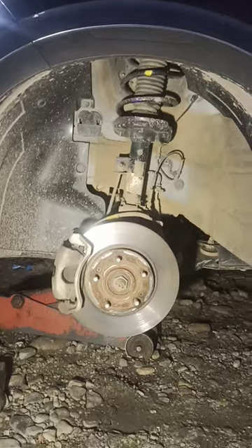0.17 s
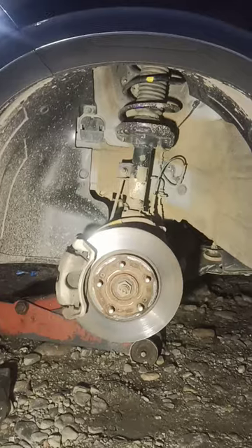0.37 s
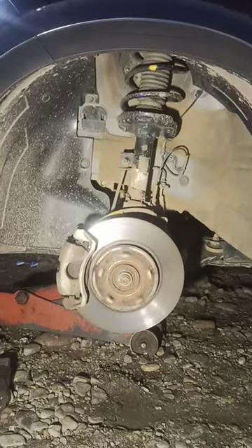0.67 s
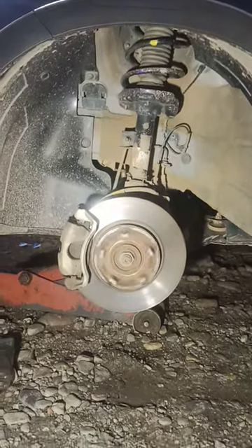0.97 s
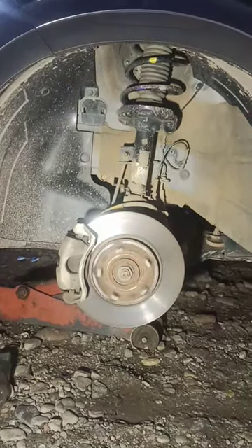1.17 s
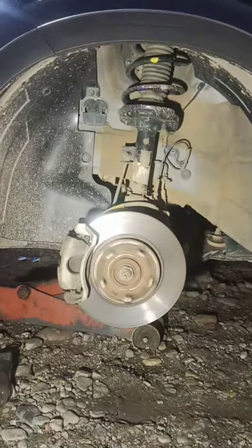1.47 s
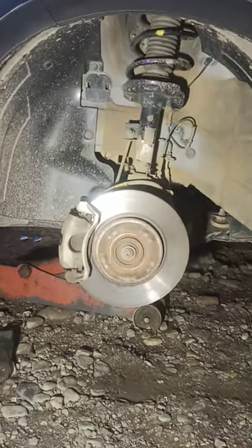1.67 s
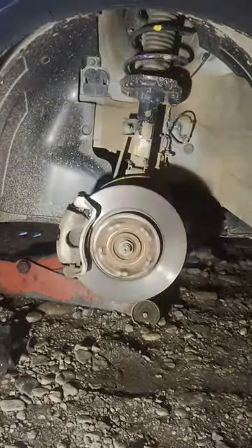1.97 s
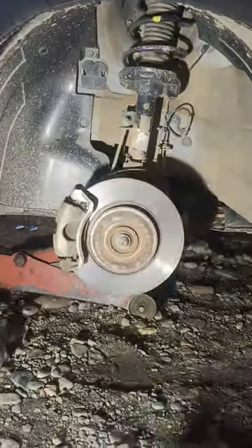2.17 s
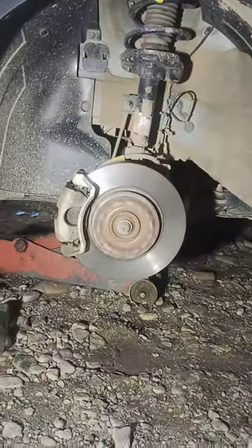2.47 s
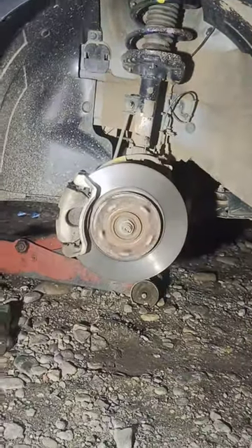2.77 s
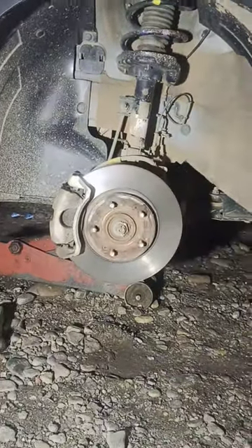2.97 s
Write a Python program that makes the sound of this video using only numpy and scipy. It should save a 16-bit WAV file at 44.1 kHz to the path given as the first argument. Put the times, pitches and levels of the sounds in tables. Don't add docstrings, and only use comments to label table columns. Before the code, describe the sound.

A jacked-up car idles in gear, its bare hub turning: fluttering low rumble and gear roar, faint brake hiss, scuffs and thumps, disc ringing midway, a bright clink later; outdoors, close phone microphone.

```python
import sys
import numpy as np
from scipy import signal
from scipy.io import wavfile
from scipy.ndimage import uniform_filter1d

SR = 44100
rng = np.random.default_rng(int(sys.argv[2]) if len(sys.argv) > 2 else 0)


def ratio(d):
    e = np.asarray(d, float) / 20
    return 10 ** e


def to_wav(s):
    ch = np.atleast_2d(s).T
    pcm = np.round(np.clip(ch, -1, 1) * 32767)
    wavfile.write(sys.argv[1], SR, pcm.astype(np.int16))


N = 137151
T = np.arange(N) / SR


def evened(x):
    return x / np.sqrt(np.mean(x ** 2) + 1e-20)


def curve(times_s, values):
    return np.interp(T, times_s, values)


def kept(start_s, length_s, edge_s, release_s=None):
    rise = (T - start_s) / edge_s
    fall = (start_s + length_s - T) / (release_s or edge_s)
    return np.sin(np.pi / 2 * np.clip(np.minimum(rise, fall), 0, 1)) ** 2


def slice_steps():
    slice_s = 0.022
    steps = np.clip(rng.standard_normal(400), -2, 2)
    number = np.minimum(T / slice_s, 399).astype(int)
    return uniform_filter1d(steps[number], size=300)


def noise(points, patchy_db, slice_db, slices, size=512, wide=6, long=8):
    hop = size // 4
    point_hz, point_db = np.transpose(points)
    frames, hz = N // hop + 5, np.fft.rfftfreq(size, 1 / SR)
    real, imag, patch = rng.standard_normal((frames, len(hz), 3)).T
    patch = uniform_filter1d(patch, size=int(wide), axis=0)
    patch = evened(uniform_filter1d(patch, size=int(long), axis=1))
    colour_db = np.interp(np.log(hz + 1), np.log(point_hz + 1), point_db, left=-90, right=-90)
    spectrum = (real + 1j * imag) * ratio(colour_db[:, None] + patchy_db * np.clip(patch, -2, 2))
    sound = signal.istft(spectrum, nperseg=size, noverlap=size - hop)[1][:N]
    return evened(sound * ratio(slice_db * slices))


def slow_wander():
    wander = uniform_filter1d(rng.standard_normal(12000), size=150)
    return evened(uniform_filter1d(wander, size=150))


def held(rows, swell, waver, beat_db):
    out = np.zeros(N)
    for start_s, length_s, pitch_hz, level_db in rows:
        drift, beat = slow_wander(), slow_wander()
        first = round(start_s * SR)
        at = slice(first, first + 12000)
        phase = 2 * np.pi * np.cumsum(pitch_hz * (1 + waver * drift)) / SR
        tone = np.sin(phase) * ratio(level_db + beat_db * beat)
        gain = kept(start_s, length_s, swell * length_s)[at]
        out[at] += np.sqrt(2) * gain * tone[:len(gain)]
    return out


# start_s, level_db
ENGINE_LEVEL = [(.07, -39.5), (.13, -27), (.5, -27.5), (.8, -31.5), (1.07, -34), (1.3, -30), (1.6, -34),
                (1.72, -29), (2.1, -27.5), (2.5, -28.5), (2.72, -32), (3.1, -33)]
# pitch_hz, level_db (per Hz)
RUMBLE_COLOUR = [(12, -42), (20, -2), (38, -31.5), (65, 1), (139, 5), (316, -12.5), (377, -15.5),
                 (409, -12.5), (500, -17.5), (650, -53), (1100, -120)]


def engine(slices):
    throbs_per_s, throb_db = 100, -6.5
    when = rng.random(N) < throbs_per_s / SR
    size = when * ratio(1.7 * np.minimum(rng.exponential(1, N), 4))
    kind = rng.integers(0, 8, N)
    throbs = np.zeros(N)
    for k, pitch_hz in enumerate(np.geomspace(65, 210, num=8)):
        u = np.linspace(-2, 2, int(2 * SR / pitch_hz))
        pulse = np.cos(np.pi * 1.6 * u) * np.exp(-1.5 * u ** 2)
        throbs += signal.oaconvolve(size * (kind == k), pulse)[:N]
    wash = noise(RUMBLE_COLOUR, 0.94, 0.85, slices, size=2048)
    return ratio(curve(*np.transpose(ENGINE_LEVEL)) + 1.5) * evened(wash + ratio(throb_db) * evened(throbs))


# start_s, roar_db, growl_db
ROAR_LEVEL = [(.07, -51, -44), (.3, -48.5, -40), (.55, -53.5, -46.5), (.82, -51.5, -39), (1.048, -55, -57),
              (1.4, -51, -43), (1.6, -51, -36), (1.9, -52, -41), (2.1, -46, -41), (2.55, -49, -37.5),
              (2.75, -51.5, -41.5), (3.1, -56, -48)]
# pitch_hz, level_db (per Hz)
BODY_COLOUR = [(150, -31), (250, -8.5), (450, -8), (1000, -9), (1450, -10), (1700, -14.5), (3000, -23),
               (5400, -32), (6500, -49), (9000, -62)]
# pitch_hz, level_db (per Hz)
GROWL_COLOUR = [(170, -20.5), (280, -3), (550, -2.5), (1000, -9)]


def roar_and_growl(slices):
    start_s, roar_db, growl_db = np.transpose(ROAR_LEVEL)
    roar = ratio(curve(start_s, roar_db) + 12.5) * noise(BODY_COLOUR, 0.77, 1.5, slices)
    growl = ratio(curve(start_s, growl_db)) * noise(GROWL_COLOUR, 1.6, 1.7, slices, size=1024)
    return roar + growl


def gear_whine():
    pitch_hz, width_hz, level_db = 1330, 110, -44
    r = np.exp(-np.pi * width_hz / SR)
    jitter = rng.standard_normal(N) + 1j * rng.standard_normal(N)
    slow = signal.lfilter([1], [1, -2 * r, r * r], jitter)
    whine = evened((slow * np.exp(2j * np.pi * pitch_hz * T)).real)
    return ratio(level_db) * kept(1.11, 0.88, 0.036) * whine


# start_s, level_db
DRAG_LEVEL = [(.07, -67), (.2, -63), (.33, -65.5), (.5, -71.5), (1.0, -74.5), (1.3, -71), (1.7, -69.5),
              (1.92, -71), (2.0, -62), (2.6, -67), (2.7, -70.5), (3.1, -75.5)]
# pitch_hz, level_db (per Hz)
HISS_COLOUR = [(3820, -31), (6500, -17), (7410, -4), (9390, 2), (11000, -1.5), (13600, 1.5), (15500, 0)]


def pad_hiss(slices):
    return ratio(curve(*np.transpose(DRAG_LEVEL))) * noise(HISS_COLOUR, 1.3, 1.6, slices)


# start_s, length_s, level_db
LULLS = [
    (.243, .012, -5),
    (.336, .008, -5),
    (.545, .012, -6),
    (.615, .01, -5),
    (.705, .016, -5),
    (1.06, .03, -4),
    (2.71, .012, -4),
    (2.911, .017, -10),
]


def drivetrain(slices):
    bed = roar_and_growl(slices) + pad_hiss(slices) + gear_whine()
    treble = signal.filtfilt(*signal.butter(2, 2000, "high", fs=SR), bed)
    lull_db = sum(level_db * kept(start_s, length_s, .4 * length_s) for start_s, length_s, level_db in LULLS)
    return bed + (ratio(lull_db) - 1) * treble


# pitch_hz, level_db (per Hz)
SCRAPE_COLOUR = [(200, -12), (450, 0.5), (800, -7.5), (2100, -7.5), (5300, -22.5), (6400, -38.5),
                 (7500, -59), (9500, -72)]
# pitch_hz, level_db (per Hz)
RASP_COLOUR = [(5500, -20), (7000, -8), (8000, -8.5), (9500, -3.5), (11800, -9), (13500, -3.5), (15500, -5)]
# start_s, length_s, scrape_db, rasp_db
SCUFFS = [(0.079, .04, -37.5, -58), (0.11, 0.068, -32, -52), (.8, .025, -40.5, -64),
          (1.126, 0.036, -31.5, -53), (1.135, .018, -29.5, -63), (1.15, 0.024, -41, -57),
          (1.254, 0.016, -64, -68), (1.433, .035, -38, -62), (1.485, 0.05, -37, -61),
          (1.652, 0.069, -40.5, -67), (1.94, 0.056, -66, -60), (2.009, 0.11, -35, -65),
          (2.196, .026, -32, -43.5), (2.219, .022, -35, -52), (2.335, 0.044, -47, -83),
          (2.435, 0.13, -36, -66), (3.06, 0.017, -70, -67), (2.927, 0.03, -36, -69), (2.72, .04, -45, -75),
          (2.775, .025, -44, -70), (2.655, .022, -50, -64), (2.979, 0.018, -42, -80)]


def scuffs(slices):
    scrape = noise(SCRAPE_COLOUR, 1.9, 0.33, slices, wide=2.3, long=8.9)
    rasp = noise(RASP_COLOUR, 7.6, .4, slices, wide=1, long=26)
    out = np.zeros(N)
    for start_s, length_s, scrape_db, rasp_db in SCUFFS:
        gain = kept(start_s, 1.31 * length_s, 0.36 * length_s, 0.9 * length_s)
        out += gain * (ratio(scrape_db) * scrape + ratio(rasp_db) * rasp)
    return out


# start_s, length_s, pitch_hz, level_db
THUMPS = [(.5, 0.034, 91, -25), (1.11, 0.03, 95, -25), (1.135, .025, 520, -40), (1.72, 0.04, 137, -34),
          (2.01, 0.1, 149.2, -25.5), (2.04, 0.08, 80, -24), (2.18, 0.031, 152, -33),
          (2.22, 0.046, 173.6, -23.5), (2.77, 0.041, 173.3, -21.5), (2.22, .03, 400, -33),
          (2.775, .03, 350, -33), (2.72, .025, 510, -36), (2.91, 0.032, 107.5, -24)]


def thumps():
    return held(THUMPS, swell=0.5, waver=.2, beat_db=1.1)


# start_s, length_s, pitch_hz, level_db
DISC_MODES = [(1.383, 0.06, 3060, -51), (1.375, .05, 5600, -63), (1.39, .04, 1340, -42),
              (1.4, 0.031, 2116, -43.5), (1.4, 0.045, 4620, -54), (1.425, 0.045, 2120, -37),
              (1.432, 0.026, 3063, -46), (1.438, 0.03, 4624, -44), (1.432, 0.03, 5750, -54),
              (1.452, .022, 5600, -48), (1.435, .035, 8040, -65), (1.435, .025, 13950, -63),
              (1.448, 0.036, 845, -34), (1.445, 0.035, 1330, -36), (1.49, .032, 1350, -39),
              (1.44, .025, 13250, -65), (1.445, .035, 12608, -63), (1.452, 0.031, 3060, -31),
              (1.46, .035, 11350, -64), (1.466, 0.03, 4620, -37), (1.471, 0.032, 5570, -41),
              (1.498, .022, 5570, -47), (1.47, 0.027, 2106, -41), (1.47, 0.048, 8150, -63),
              (1.483, 0.014, 2700, -40), (1.495, .02, 2790, -45), (1.48, 0.022, 8662, -56),
              (1.481, 0.054, 3063, -31.5), (1.486, 0.03, 4620, -45), (1.51, .04, 4630, -58),
              (1.503, .028, 11050, -61), (1.505, 0.022, 9200, -57), (1.508, 0.018, 12700, -54),
              (1.518, .034, 5580, -59), (1.58, .14, 14600, -74), (1.58, .2, 11500, -82),
              (1.6, .2, 8700, -80)]


def brake_disc():
    return held(DISC_MODES, swell=0.35, waver=0.0025, beat_db=1.3)


# start_s, length_s, pitch_hz, level_db
CLINKS = [(.075, 0.024, 1267, -35), (.119, .012, 2130, -39), (0.13, 0.018, 1085, -36),
          (.12, 0.046, 553, -35), (1.124, 0.03, 10880, -54), (1.126, .033, 9720, -53),
          (1.128, .03, 13800, -58), (1.13, 0.025, 2240, -42), (1.13, .022, 2060, -41),
          (1.13, .028, 2560, -43), (1.13, .025, 2950, -45), (1.132, .025, 3460, -46),
          (1.13, .028, 4230, -51), (1.132, .024, 1460, -38), (1.13, .03, 5360, -52),
          (1.13, 0.032, 931, -38.5), (1.13, 0.03, 5230, -53), (1.14, .035, 14600, -62),
          (1.148, 0.04, 10900, -70), (1.135, .03, 9050, -64), (1.155, .035, 8600, -72),
          (2.195, 0.03, 12400, -50), (2.196, .028, 12600, -47), (2.198, 0.02, 3490, -42.5),
          (2.198, 0.042, 6970, -58), (2.2, 0.025, 10300, -49), (2.198, .025, 11600, -46),
          (2.198, .02, 9850, -52), (2.199, 0.045, 4600, -44), (2.2, 0.043, 9280, -53),
          (2.205, .038, 12900, -51), (2.2, .025, 13800, -52), (2.2, .025, 14300, -55),
          (2.2, .022, 15000, -54), (2.201, 0.016, 2200, -40), (2.212, .016, 2280, -42),
          (2.2, 0.02, 5400, -50)]


def clinks():
    return held(CLINKS, swell=0.25, waver=.004, beat_db=1.6)


# start_s, length_s, pitch_hz, level_db
RATTLES = [(.096, .036, 5090, -46), (.225, .024, 2890, -52), (2.74, .027, 3970, -56),
           (2.842, .02, 3300, -57), (2.86, .02, 3400, -54), (2.882, .018, 3450, -59),
           (2.93, .014, 1480, -42), (2.934, .016, 3970, -47), (2.94, .018, 2770, -47),
           (2.98, .012, 2700, -52), (2.982, .018, 3900, -58), (3.058, .022, 3750, -63)]


def rattles():
    return held(RATTLES, swell=.35, waver=.009, beat_db=3)


def cut_click():
    return ratio(-54) * (np.arange(N) == N - 40)


def scene():
    slices = slice_steps()
    running = engine(slices) + drivetrain(slices)
    metal = brake_disc() + clinks() + rattles()
    return (running + scuffs(slices) + thumps() + metal + cut_click())[None]


def band_limit(x):
    return signal.sosfilt(signal.butter(12, 15690, fs=SR, output="sos"), x)


def record(dry):
    start_s, fade_in_s = 0.057, 0.022
    fade = np.clip((T - start_s) / fade_in_s, 0, 1) ** 2.3
    return band_limit(dry * fade)


dry = scene()
out = record(dry)
to_wav(out)
```